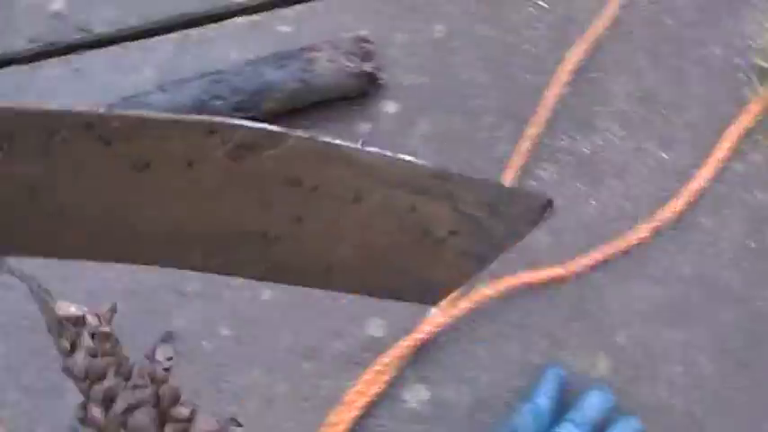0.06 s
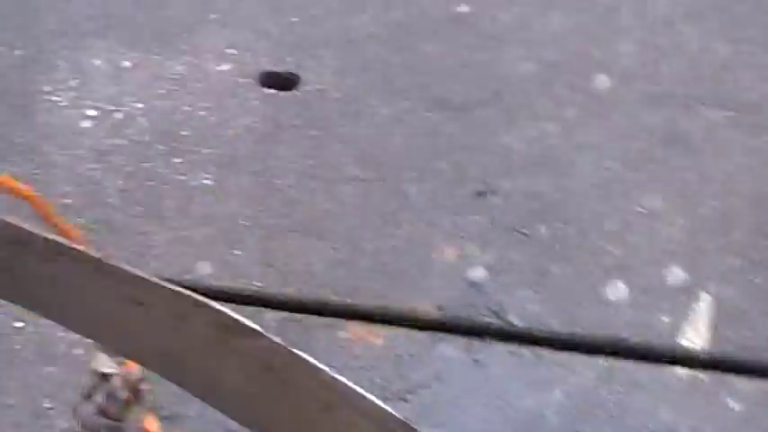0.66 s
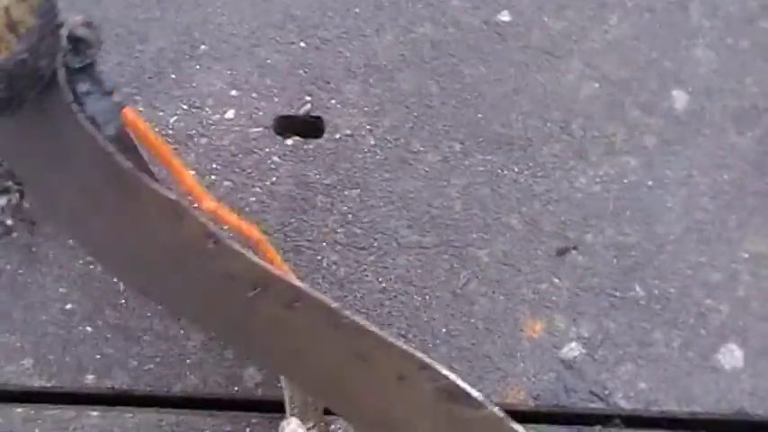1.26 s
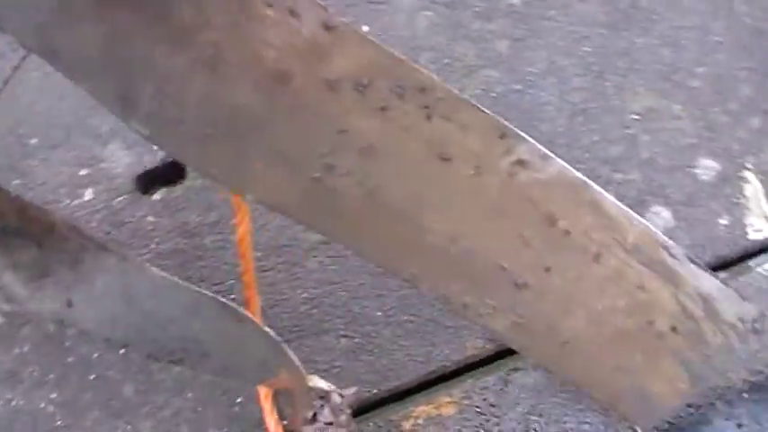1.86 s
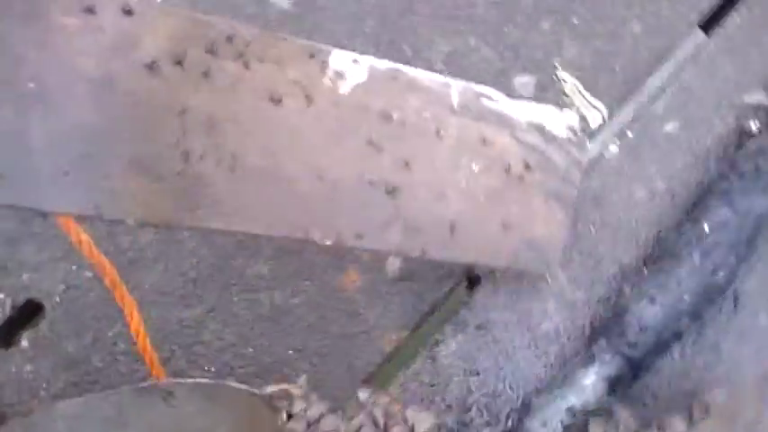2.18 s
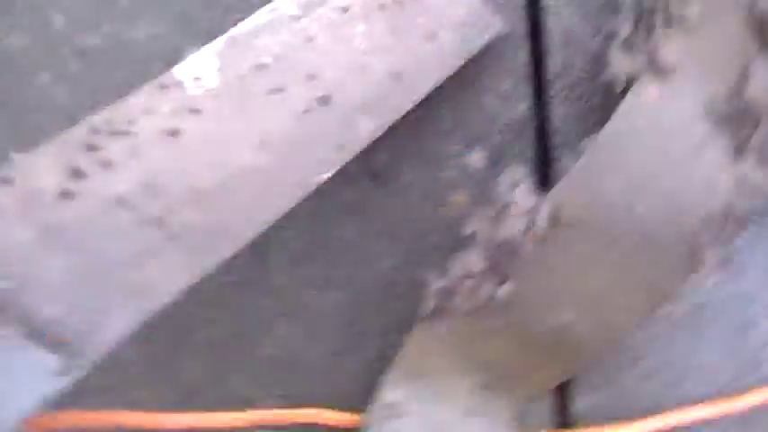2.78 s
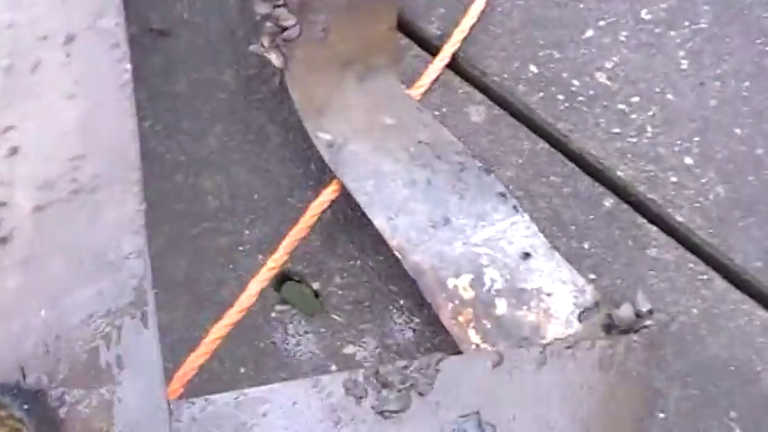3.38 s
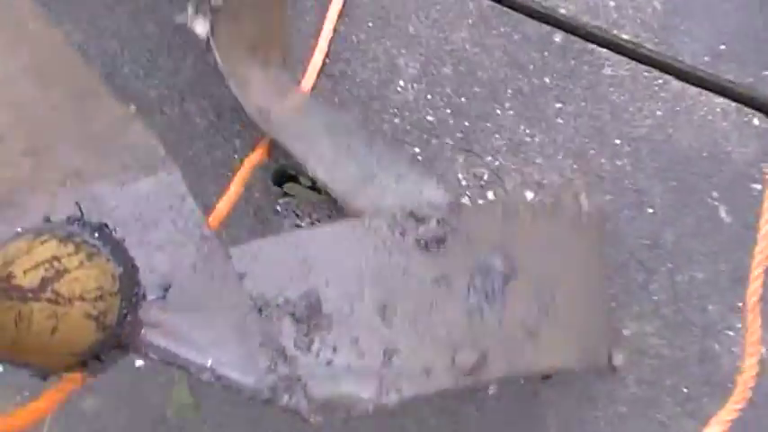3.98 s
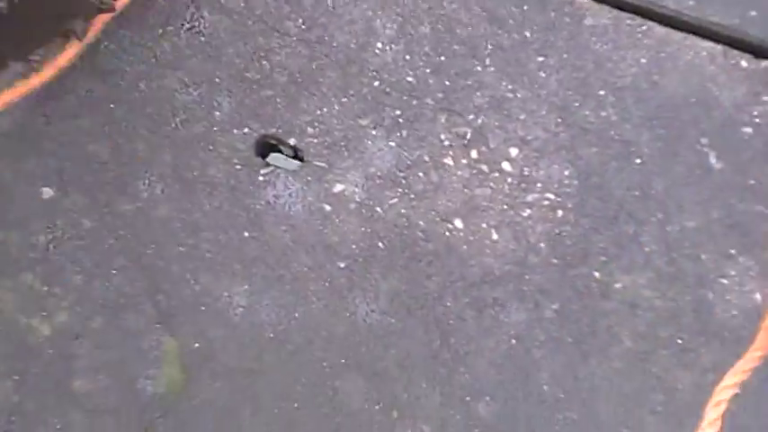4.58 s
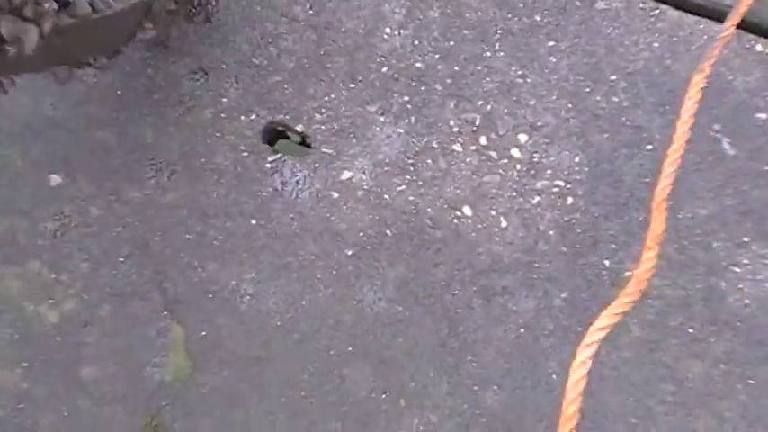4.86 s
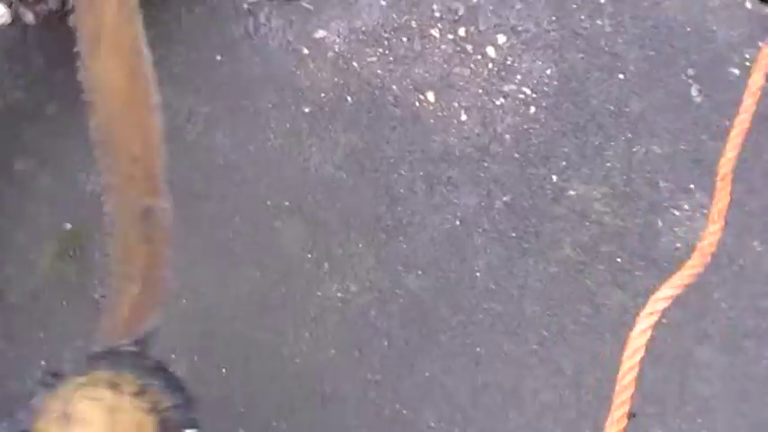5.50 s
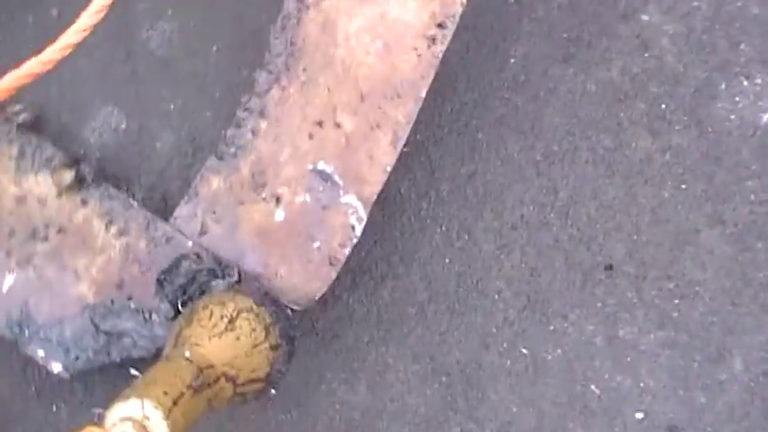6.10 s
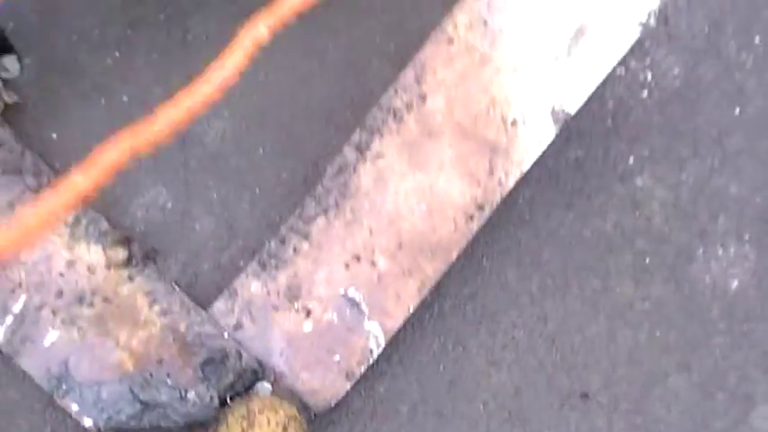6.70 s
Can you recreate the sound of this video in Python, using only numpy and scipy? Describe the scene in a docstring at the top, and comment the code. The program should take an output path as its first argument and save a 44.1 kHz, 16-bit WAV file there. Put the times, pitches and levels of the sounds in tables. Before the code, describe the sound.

Bent sheet metal is dragged and turned over on gritty stone, grinding and clanking with brittle clicks and rumbling gusts of wind.

```python
"""Outdoors on paving slabs, one microphone held close above a bent, rusty strip of shell-crusted metal.
The strip is dragged, turned over and set down. Its edges catch and knock, and each part that touches
the stone rings with its own modes. Grit grinds under it, shell and rust snap off, a loose piece tinkles.
Gusts buffet the microphone, with faint open air behind."""
import sys
import numpy as np
from scipy import signal
from scipy.fft import rfft, irfft, next_fast_len
from scipy.io import wavfile
from scipy.ndimage import uniform_filter1d

SR = 44100
rng = np.random.default_rng(int(sys.argv[2]) if len(sys.argv) > 2 else 0)


def pcm_store(signal):
    """Save signal as 16-bit PCM."""
    levels = np.round(np.clip(np.atleast_2d(signal), -1, 1) * 32767)
    wavfile.write(sys.argv[1], SR, levels.astype(np.int16).T)


N = 297234

# Levels in the tables are relative; each source sets its own gain.
# spectrum of the open air behind the strip: frequency_hz, density_db
AIR_SPECTRUM = [(40, -13), (120, -20), (300, 3), (600, 10), (1400, -4), (2500, -35), (11000, -34),
                (16000, -41)]
# spectrum of turbulence at the microphone: frequency_hz, density_db
RUMBLE_SPECTRUM = [(25, -30), (55, -10), (110, -0.5), (180, 0.5), (265, -3), (345, -9), (560, -24),
                   (1100, -35.5), (2000, -86)]
# spectrum of the flutter in strong gusts: frequency_hz, density_db
FLUTTER_SPECTRUM = [(200, -36), (450, -9), (800, -8), (1500, -19), (3000, -33)]
# gusts build up and collapse: start_s, length_s, level_db, growth_db
GUSTS = [(-0.05, 0.67, -44.5, -4), (0.958, 0.16, -34, -2), (1.2, 0.24, -37, -9), (1.546, 0.3, -36, -5.5),
         (2.13, 0.22, -41.5, -3), (2.66, 0.76, -44.5, 4.5), (3.688, 0.1, -33, 2), (3.797, 0.12, -36.5, 0),
         (4.2, 0.15, -40.5, -10), (4.418, 0.32, -26.5, 11.5), (4.77, 0.3, -29, -10),
         (5.026, 0.16, -20, 2.5), (5.331, 0.18, -38.5, -5), (5.526, 0.12, -27.5, 4.5),
         (5.83, 0.22, -48, -13), (6.257, 0.3, -32, -7), (6.484, 0.064, -19, -2), (6.595, 0.07, -25, 10.5)]
# single eddies thump the microphone: start_s, level_db, pitch_hz
BUFFETS = [(0.683, -25, 164), (0.894, -20.5, 96.9), (0.982, -16, 196), (1.335, -19, 119),
           (1.874, -13.5, 175), (2.654, -16.5, 232), (2.713, -8.5, 310), (3.774, -8.5, 169),
           (4.794, -3, 250), (5.164, -1, 252), (6.497, -8, 190)]
# a small loose piece of metal tinkles: start_s, level_db
TINKS = [(0.516, -25), (1.4111, -24.5)]
# modes of that piece: pitch_hz, level_db, t60_s
SHARD_MODES = [(4700, -16, 0.12), (5900, -7, 0.093), (7181, -7, 0.055), (8296, -9, .07), (8700, -5, 0.13),
               (10190, -0.5, 0.088), (10400, -6, .06), (11800, -7, .05), (12207, 0, 0.067)]
# brittle shell and rust snap, and flakes tap the stone: start_s, level_db, pitch_hz
SNAPS = [(0.612, -34, 9900.0), (0.686, -20, 10000), (0.686, -30.5, 1740), (0.7347, -34, 8960),
         (1.002, -32, 12400.0), (1.0476, -24.5, 1300.0), (1.115, -22.5, 9700), (1.1877, -39, 9600.0),
         (1.2395, -25, 800), (1.869, -19, 10300), (1.88, -18, 9300), (1.9742, -44.5, 9200),
         (2.099, -39.5, 7500), (3.6874, -32.5, 11100), (5.513, -33, 10900), (5.6543, -19, 8800),
         (5.6636, -19, 10900)]
# modes of the five parts of the strip: pitch_hz, level_db, t60_s
TIP = [(688, -2.5, 0.16), (914, 8, 0.033), (1313, -0.5, 0.089), (1965, -51, 0.035), (2990, -1, 0.035),
       (4140, 7.5, 0.031), (4560, 10.5, 0.018), (6960, 8, 0.019), (8900, -11, 0.09), (10420, 10.5, 0.019),
       (12000, -16, 0.036)]
EDGE = [(778, -8.5, 0.27), (1220, -0.5, 0.069), (1308, -5, 0.073), (2390, -13, 0.061), (2490, -7, 0.032),
        (3390, -16, 0.046), (3940, -7.5, 0.044), (4240, -16, 0.12), (5100, -11, 0.032), (5300, -14, 0.074),
        (6800, -25, 0.045), (7000, -31, 0.061), (10930, -9, 0.043), (12200, 0, 0.034)]
BEND = [(368, 5, 0.52), (813, -2, 0.32), (1250, 6, 0.017), (1420, 0, 0.26), (2160, 10.5, .014),
        (2300, -8, 0.12), (2720, -11, 0.14), (2930, 1, 0.1), (4240, 0, 0.016)]
BLADE = [(595, -3, 0.44), (799, -6, 0.078), (914, 5, 0.087), (1240, 5, 0.04), (1800, -1, 0.37),
         (1940, -15, 0.16), (2170, -1, 0.17), (3230, 8, 0.098), (4000, -1, 0.063), (4790, 8.5, 0.037),
         (6000, 3, 0.044), (6740, -18.5, .06), (7600, 6.5, 0.051), (8640, 1, 0.051), (10750, 11, 0.031),
         (10900, -9, 0.036)]
HEEL = [(866, -18, 0.25), (1212, 4.5, 0.053), (1300, 0, 0.024), (1743, -5, 0.14), (2950, -5, 0.1),
        (3238, -3, 0.032), (4600, 0, 0.028), (6100, -37, .05), (9380, -0.5, 0.022), (11160, 1.5, 0.038)]
# the part on the ground, whose crust softens knocks above top_hz: start_s, end_s, modes, top_hz
TOUCHING = [(0, 2.1, TIP, 12600), (2.1, 2.9, EDGE, 12000), (2.9, 3.7, BEND, 13500),
            (3.7, 4.3, BLADE, 12500), (4.3, 6.8, HEEL, 14000)]
# spectrum of grit dragged over stone: frequency_hz, gain_db
GRIT_SPECTRUM = [(150, -8.5), (400, 0.5), (750, 4), (1300, 3), (2200, 0), (3500, -5.5), (7000, -9),
                 (11000, -3.5), (13000, -10), (16000, -25)]
# the strip is hauled in pulls: start_s, length_s, rasp_db, hiss_db, growth_db
PULLS = [(-0.05, 0.6, -38.5, -40.5, -2.5), (0.95, 0.35, -37, -38.5, 9.5), (1.554, 0.14, -34, -34.5, -12),
         (1.727, 0.14, -38.5, -34.5, -14.5), (2.289, 0.19, -39.5, -35.5, 3), (2.683, 0.37, -35.5, -35, -9),
         (3.046, 0.38, -34.5, -34, 5), (3.442, 0.16, -32.5, -28.5, 3.5), (3.669, 0.14, -37, -32.5, 14),
         (4.061, .1, -60, -38, -2), (4.36, 0.25, -52, -40, -1), (4.616, 0.13, -40, -34, 3),
         (4.822, 0.44, -37, -36.5, -1.5), (5.587, 0.18, -40.5, -31.5, -1.5),
         (5.822, 0.13, -38.5, -33.5, -2), (6.049, 0.097, -32, -28.5, -1), (6.34, 0.44, -36, -36, 8.5)]
# an edge judders over the stone in a run of catches: start_s, length_s, level_db, brightness_db
SKIDS = [(0.434, 0.13, -32, 0.5), (1.2373, .05, -18.5, 7.5), (1.688, 0.082, -32, 7), (4.665, .055, -25, 8),
         (5.1974, 0.03, -20, 11.5), (6.005, 0.09, -28.5, -1.5), (6.126, .035, -24, 2.5),
         (6.4095, 0.058, -24, 0.5), (6.7092, 0.032, -20.5, 7.5)]
# the strip knocks on the paving: start_s, contact_s, level_db, brightness_db
KNOCKS = [(0.398, 0.00035, -19.5, 19), (0.4224, 0.00073, -26.5, 23), (0.4655, 0.00044, -21, 10),
          (0.5016, 0.0034, -25, 9), (0.9826, 0.00089, -35, -7), (1.3007, .009, -29.5, 15),
          (1.3395, 0.0058, -23.5, 25), (1.563, 0.0087, -23, 3.5), (1.7643, .0006, -26, 24),
          (2.172, 0.005, -30, -2), (2.2258, 0.0096, -16, -0.5), (2.2498, 0.0015, -18.5, 6),
          (2.2649, 0.0018, -30.5, -10), (2.3026, .0014, -27.5, 5), (2.323, 0.0033, -27, 3),
          (2.3698, 0.0015, -20.5, 2), (2.391, .001, -18.5, 4.5), (2.4164, 0.0044, -25.5, -1),
          (2.4361, 0.0064, -31, 0), (2.4639, 0.0046, -18.5, 8), (2.573, 0.0098, -37, 16),
          (3.0015, 0.0075, -21.5, -8), (3.429, 0.0051, -25, 25), (3.4991, 0.0052, -23.5, 12),
          (3.78, 0.0079, -20, -6.5), (3.796, 0.0033, -26.5, 40), (3.8235, 0.026, -25.5, -9.5),
          (3.862, 0.0079, -19, 20), (3.9191, 0.017, -15.5, 5.5), (4.004, 0.0031, -20, 19),
          (4.0232, 0.0096, -27, -3.5), (4.0917, 0.004, -34, -3.5), (4.1283, 0.0015, -26.5, 20),
          (4.1867, 0.0032, -32.5, 16), (4.2331, 0.0022, -26.5, 12), (4.332, 0.0058, -37, 17),
          (4.3828, 0.0032, -30, 14), (4.4762, 0.006, -33, 18), (4.861, 0.019, -27, 8),
          (4.9684, 0.007, -20.5, 10.5), (5.037, 0.0026, -34, -15), (5.1113, 0.0068, -25.5, 20),
          (5.127, 0.0023, -28, 34), (5.1844, .0005, -26, 21), (5.277, 0.0023, -33.5, -8),
          (5.3226, .0037, -28.5, 12), (5.4671, .006, -35.5, 16), (5.7164, 0.013, -30.5, 47),
          (5.9252, 0.0072, -27.5, -5), (5.971, 0.0043, -22.5, -1), (6.1005, 0.004, -17.5, 2.5),
          (6.2386, 0.0037, -28, 3.5), (6.327, .005, -25.5, 0.5), (6.4934, 0.0035, -20, 5),
          (6.612, 0.0014, -20.5, 4), (6.6634, 0.00067, -27.5, -8)]
# bands of a knock's body, bite and crack: low_hz, high_hz
KNOCK_BANDS = [(540, 2200), (2200, 6500), (6500, 16000)]
# share of a knock's brightness given to each band: body_share, bite_share, crack_share
BRIGHTNESS_SHARES = [-0.74, 0.02, 0.29]

RING_SAMPLES = 8000
SWELL_TIMES_S = np.linspace(0, N / SR, 3400)  # coarse time grid for gusts and pulls


def from_db(db):
    """Decibels to gain."""
    return 10 ** (np.asarray(db) / 20)


def rms_one(x):
    """Scale to rms 1."""
    return x / np.sqrt(np.mean(x ** 2) + 1e-20)


def energy_one(x):
    """Scale to a total energy of 1."""
    return x / np.sqrt(np.sum(x ** 2) + 1e-20)


def level_curve(power):
    """Power on the coarse time grid to a level in dB at every sample."""
    return 10 * np.log10(np.interp(np.arange(N) / SR, SWELL_TIMES_S, power))


def add(out, start_s, sound):
    """Mix a sound in at start_s."""
    start = max(round(start_s * SR), 0)
    out[start:start + len(sound)] += sound[:max(N - start, 0)]


def filtered(x, hz, kind, order=2):
    """Butterworth filter."""
    return signal.sosfilt(signal.butter(order, hz, kind, fs=SR, output="sos"), x)


def coloured(x, spectrum):
    """Shape a steady sound with a smooth spectrum; rms 1."""
    hz, db = np.transpose(spectrum)
    size = next_fast_len(N)
    bins_hz = np.maximum(np.arange(size // 2 + 1) * SR / size, 1)
    gain = from_db(np.interp(np.log(bins_hz), np.log(hz), db))
    return rms_one(irfft(rfft(x, size) * gain, size)[:N])


def drift(per_s):
    """A random wander through per_s values a second; rms 1."""
    knots = rng.standard_normal(4000)
    return rms_one(np.interp(np.arange(N) / SR * per_s, np.arange(len(knots)), knots))


def decay(t60):
    """An exponential fall of 60 dB in t60 seconds."""
    return np.exp(-np.log(1000) * np.arange(RING_SAMPLES) / SR / t60)


def mode(hz, t60):
    """One struck mode: a dying sine."""
    return np.sin(2 * np.pi * hz * np.arange(RING_SAMPLES) / SR) * decay(t60)


def swell(start_s, length_s, growth_db, attack_s, release_s):
    """Gain of one gust or pull: it sets in, grows or fades steadily, then dies away."""
    t = SWELL_TIMES_S - start_s
    attack = np.clip(0.5 + t / attack_s, 0, 1)
    release = np.exp(-np.clip((t - length_s) / release_s, 0, 20))
    return attack * release * from_db(growth_db * (np.clip(t / length_s, 0, 1) - 0.5))


def open_air(level_db=-53):
    """The faint, steady hush of outdoors, behind everything else."""
    return from_db(level_db) * coloured(rng.standard_normal(N), AIR_SPECTRUM)


def wind_level(breeze_db=-50):
    """Relative level in dB of gusts over a light breeze that always touches the microphone."""
    power = from_db(breeze_db) ** 2
    for start_s, length_s, db, growth_db in GUSTS:
        gust = from_db(db) * swell(start_s, length_s, growth_db, attack_s=0.01, release_s=0.014)
        power = power + gust ** 2
    return level_curve(power)


def wind(gain_db=-1.5, lump_db=3.5, flutter_db=-10.5, buffet_gain_db=1, buffet_cycles=6.8):
    """Lumpy turbulence right on the microphone, brighter in gusts; eddies swing it for a few cycles."""
    wind_db = wind_level()
    rumble = coloured(rng.standard_normal(N), RUMBLE_SPECTRUM)
    rumble /= np.sqrt(uniform_filter1d(rumble ** 2, size=1100))  # even, so lump_db sets the lumps
    strength = from_db(wind_db - wind_db.max())
    flutter = from_db(flutter_db) * strength ** 0.22 * coloured(rng.standard_normal(N), FLUTTER_SPECTRUM)
    out = from_db(wind_db + gain_db + lump_db * drift(per_s=60)) * (rumble + flutter)
    for start_s, db, hz in BUFFETS:
        onset = 1 - decay(2 / hz)
        add(out, start_s, from_db(db + buffet_gain_db) * onset * mode(hz, t60=buffet_cycles / hz))
    return out


def tinks():
    """A small loose piece of metal rings high and clean."""
    out = np.zeros(N)
    ring = sum(from_db(db) * mode(hz, t60) for hz, db, t60 in SHARD_MODES)
    for start_s, db in TINKS:
        add(out, start_s, from_db(db) * ring)
    return out


def snaps(crackle_db=-2.5, broad_db=-8.5, top_hz=13000):
    """A flake breaks with a short ping at its own pitch; the crust around it crackles on briefly."""
    out = np.zeros(N)
    for start_s, db, hz in SNAPS:
        crumble = rng.standard_normal(RING_SAMPLES) * decay(t60=0.035)
        ping = energy_one(mode(hz, t60=0.0016))
        crackle = from_db(crackle_db) * energy_one(filtered(crumble, [hz / 1.13, hz * 1.37], "band"))
        broad = from_db(broad_db) * energy_one(crumble)
        snap = filtered(ping + crackle + broad, top_hz, "low", order=4)
        add(out, start_s, from_db(db) * energy_one(snap))
    return np.sqrt(SR / 100) * out  # levels count as energy spread over 10 ms


def touching(time_s):
    """Modes and top_hz of the part of the strip that lies on the ground at time_s."""
    return next(part for _, end_s, *part in TOUCHING if time_s < end_s)


def ringing(modes, spread_db, wander=7.9):
    """The clear modes of a part of the strip; every point of contact weights them differently."""
    out = 0
    for hz, db, t60 in modes:
        # as the strip flexes, its high, strongly damped modes shift the most
        shift_hz = wander * (hz / 10000) ** 2 / t60 * rng.standard_normal()
        weight = from_db(db + spread_db * rng.standard_normal()) * rng.choice([-1, 1])
        out = out + weight * energy_one(mode(hz + shift_hz, t60))
    return energy_one(out)


def hauling(creep_db=-45.5, uneven_db=0.82):
    """Levels of rasp and hiss in dB: uneven pulls, with a slow creep over the grit between them."""
    rasp_power = hiss_power = from_db(creep_db) ** 2
    for start_s, length_s, rasp_db, hiss_db, growth_db in PULLS:
        effort = swell(start_s, length_s, growth_db, attack_s=0.028, release_s=0.037)
        rasp_power = rasp_power + (from_db(rasp_db) * effort) ** 2
        hiss_power = hiss_power + (from_db(hiss_db) * effort) ** 2
    waver_db = uneven_db * drift(per_s=14)
    return level_curve(rasp_power) + waver_db, level_curve(hiss_power) + waver_db


def grains(per_s, size_db, judder_db):
    """Sand and shell crumbs break at random, in clumps as the strip sticks and slips."""
    sizes = from_db(size_db * np.minimum(rng.exponential(1, N), 5)) * rng.choice([-1, 1], N)
    breaks = rng.random(N) < per_s / SR
    return rms_one(sizes * breaks * from_db(judder_db * drift(per_s=110)))


def rubbed_metal(grit, step_s=0.1, pressed_t60=0.02, damp_hz=4200):
    """Grit shakes the strip's modes as the contact slides; the ground stops long and high rings."""
    out = np.zeros(N)
    for start_s in np.arange(0, N / SR, step_s):
        modes, _ = touching(start_s)
        pressed = [(hz, db, min(t60, pressed_t60)) for hz, db, t60 in modes]
        force = grit[round(start_s * SR):round((start_s + step_s) * SR)]
        add(out, start_s, signal.fftconvolve(force, ringing(pressed, spread_db=4.5)))
    return filtered(out, damp_hz, "low")


def scrape(crumbs_db=-0.5, crumble_s=0.0018, metal_db=-8.5, split_hz=3000, rasp_gain_db=-2, ticks_db=-9):
    """Grit crackles on the stone just below the microphone; the grains crumble and shake the strip."""
    grit = grains(per_s=9000, size_db=4.5, judder_db=1.52)
    crumble_power = signal.lfilter([1], [1, -np.exp(-1 / (crumble_s * SR))], grit ** 2)
    crumbs = from_db(crumbs_db) * rms_one(np.sqrt(crumble_power) * rng.standard_normal(N))
    grinding = coloured(grit + crumbs + from_db(metal_db) * rubbed_metal(grit), GRIT_SPECTRUM)
    rasp_db, hiss_db = hauling()
    rasp = from_db(rasp_db + rasp_gain_db) * rms_one(filtered(grinding, split_hz, "low", order=3))
    hiss = from_db(hiss_db) * rms_one(filtered(grinding, split_hz, "high", order=3))
    large_grains = grains(per_s=130, size_db=3, judder_db=3)  # each bursts with a bright tick
    ticks = from_db(hiss_db + ticks_db) * rms_one(filtered(large_grains, [8000, 13000], "band"))
    return rasp + hiss + ticks


def snags(count=30, from_s=4.06, contact_s=0.0056, over_hiss_db=1, spread_db=2):
    """Knock rows: with the crusted side down, shells snag at random, as hard as the strip is grinding."""
    _, hiss_db = hauling()
    gap_s = (N / SR - from_s) / count
    times_s = from_s + gap_s * (np.arange(count) + rng.random(count))
    rows = []
    for start_s, (strong, bright) in zip(times_s, rng.standard_normal((count, 2))):
        level_db = hiss_db[int(start_s * SR)] + over_hiss_db + spread_db * strong
        brightness_db = 14 + 4 * bright
        rows.append((start_s, contact_s, level_db, brightness_db))
    return rows


def catches(count=5, jitter=0.15, contact_share=0.38, loss_db=0.64, spread_db=0.5):
    """Knock rows: each skid breaks into a run of unevenly spaced, weakening catches."""
    rows = []
    for start_s, length_s, db, brightness_db in SKIDS:
        gap_s = length_s / count
        for k, (late, strong) in enumerate(rng.standard_normal((count, 2))):
            catch_s = start_s + gap_s * (k + jitter * late * (k > 0))
            level_db = db - loss_db * k + spread_db * strong
            rows.append((catch_s, contact_share * gap_s, level_db, brightness_db))
    return rows


def contact_force(contact_s, slips_per_s=3200, bite=3.55, glancing_s=0.0034, swell_share=0.12):
    """An edge bites, then skids in a burst of tiny slips; a glancing contact bites less and swells."""
    samples = 1800
    progress = np.arange(samples) / SR / contact_s
    slips = (rng.random(samples) < slips_per_s / SR) * rng.standard_normal(samples)
    force = slips * (1 - np.exp(-progress / swell_share)) * np.exp(-progress ** 2)
    force[0] = bite / (1 + (contact_s / glancing_s) ** 2)
    return force


def strip_response(modes, click_db=-4, crunch_db=-2, modes_db=-1):
    """One tap on the strip: a click, crumbling crust, a wash of dense rust-damped modes, clear modes."""
    crust_noise, high_noise, low_noise = rng.standard_normal((3, RING_SAMPLES))
    high_wash = filtered(high_noise, 1600, "high") * decay(t60=0.072)
    low_wash = filtered(low_noise, 3100, "low") * decay(t60=0.094)
    ring = from_db(modes_db) * ringing(modes, spread_db=5)
    crunch = from_db(crunch_db) * energy_one(crust_noise * decay(t60=0.0031))
    out = energy_one(high_wash + low_wash) + ring + crunch
    out[0] += from_db(click_db)
    return out


def knocks(gain_db=0.5):
    """Close up, each knock, catch and snag rings the part of the strip that touches the paving."""
    out = np.zeros(N)
    for start_s, contact_s, level_db, brightness_db in KNOCKS + catches() + snags():
        modes, top_hz = touching(start_s)
        hit = signal.fftconvolve(contact_force(contact_s), strip_response(modes))
        softened = filtered(hit, top_hz, "low", order=4)
        for band_hz, share in zip(KNOCK_BANDS, BRIGHTNESS_SHARES):
            band = energy_one(filtered(softened, band_hz, "band", order=3))
            add(out, start_s, from_db(level_db + share * brightness_db) * band)
    return from_db(gain_db) * np.sqrt(SR / 100) * out  # levels count as energy spread over 10 ms


def scene():
    """Open air, wind and the strip at one microphone held close above the paving."""
    return (open_air() + wind() + scrape() + tinks() + knocks() + snaps())[None]


def record(dry, low_cut_hz=50, high_cut_hz=15900):
    """The microphone chain: a low cut against rumble, gently rounded peaks and a steep high cut."""
    low_cut = filtered(dry, low_cut_hz, "high", order=3)
    rounded = 1.367 * np.tanh(low_cut / 1.428)
    return signal.sosfilt(signal.ellip(10, 0.2, 80, high_cut_hz, fs=SR, output="sos"), rounded)


dry = scene()
out = record(dry)
pcm_store(out)
```